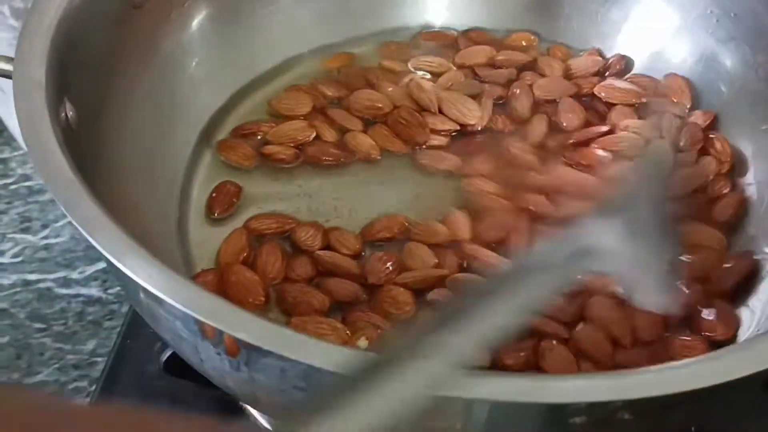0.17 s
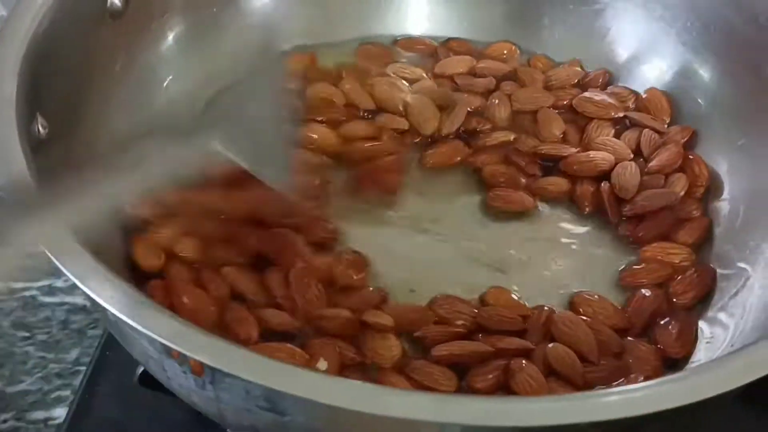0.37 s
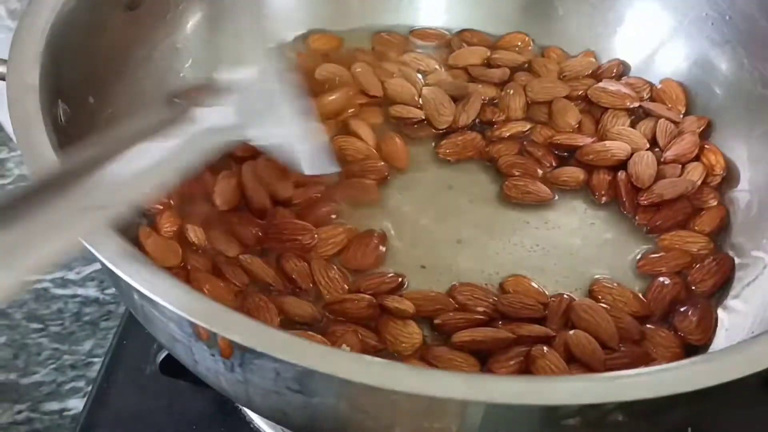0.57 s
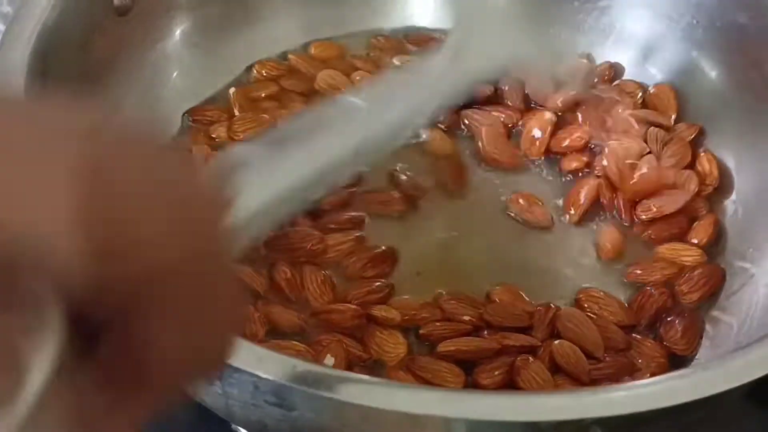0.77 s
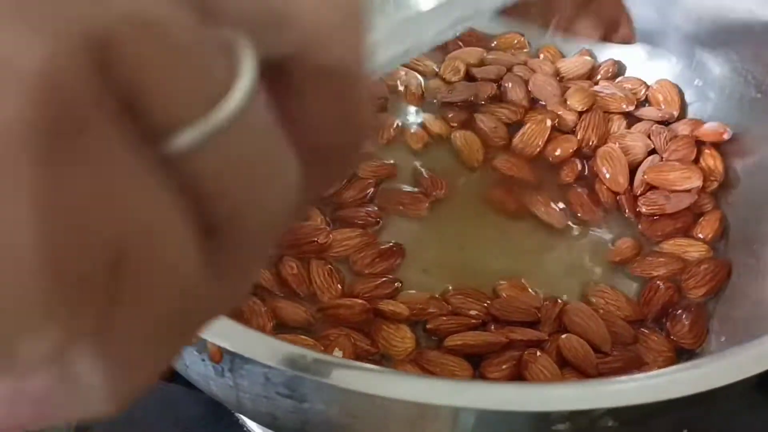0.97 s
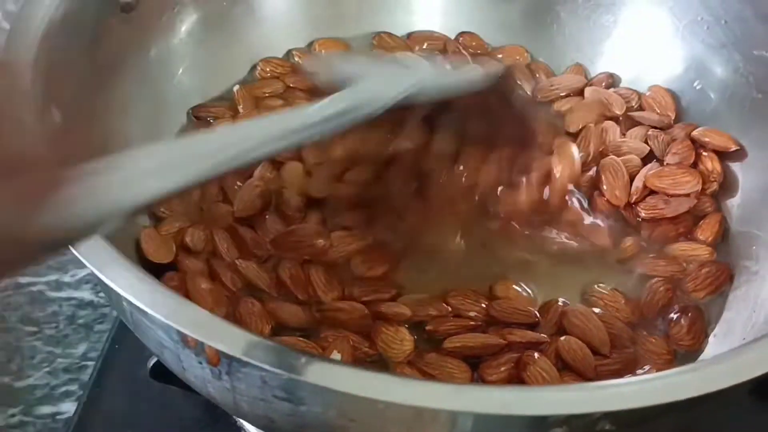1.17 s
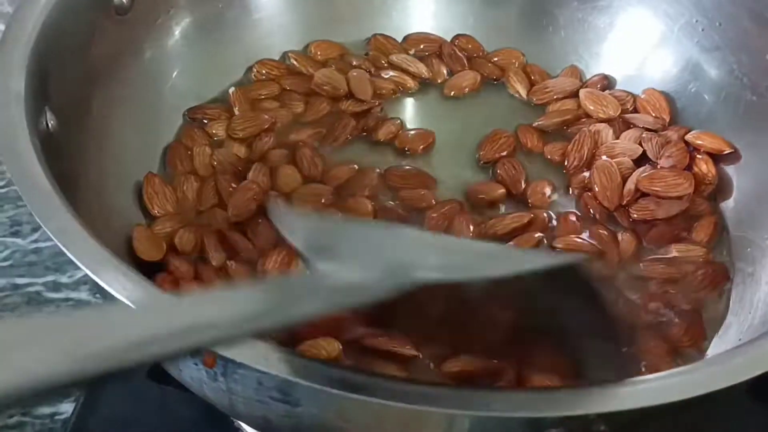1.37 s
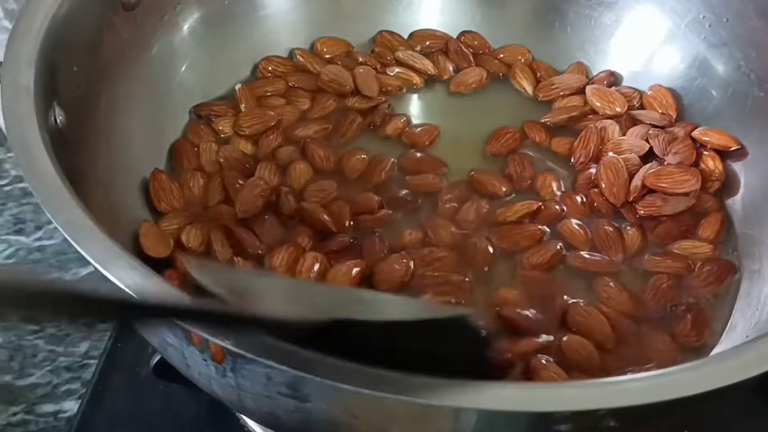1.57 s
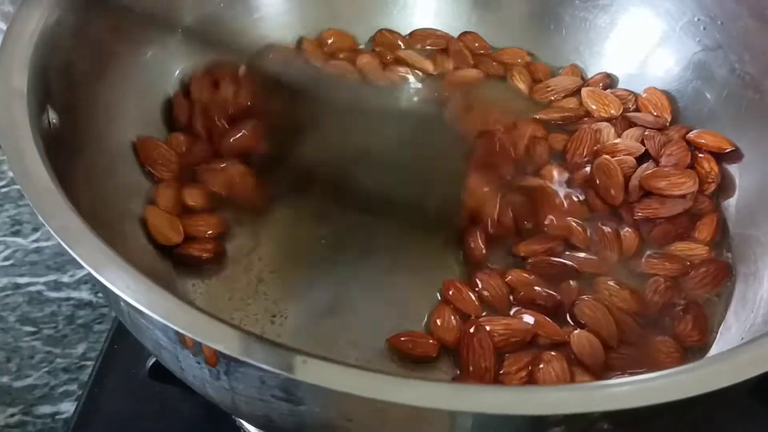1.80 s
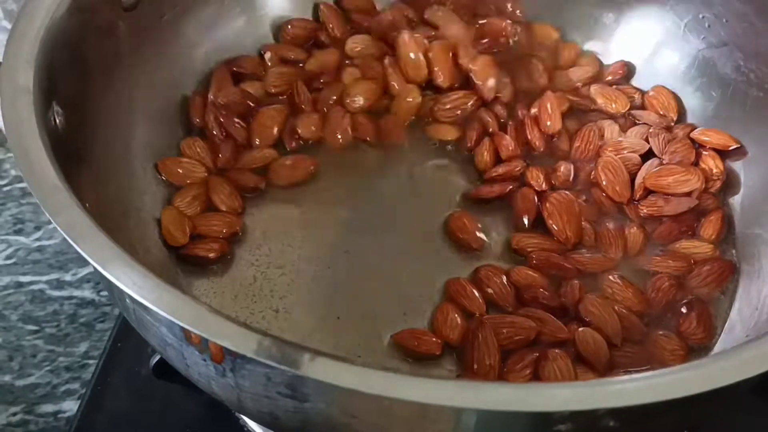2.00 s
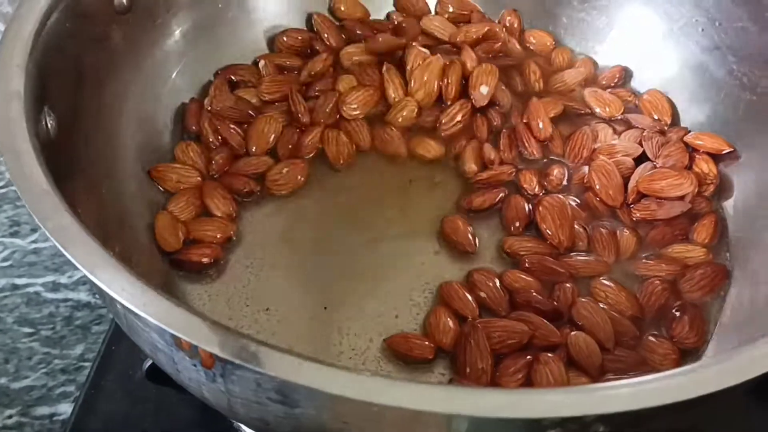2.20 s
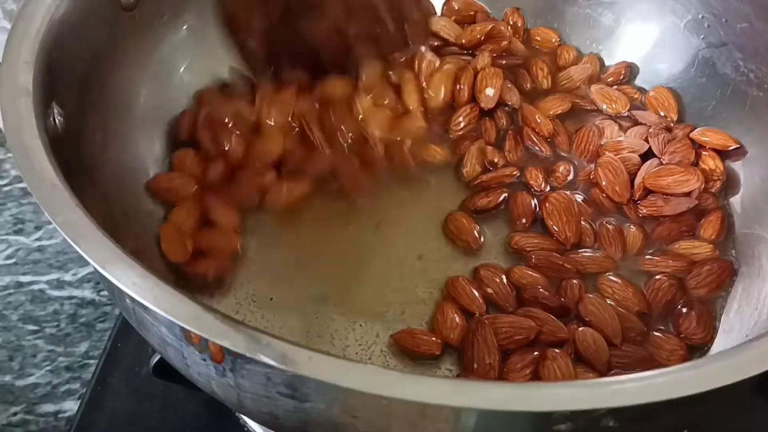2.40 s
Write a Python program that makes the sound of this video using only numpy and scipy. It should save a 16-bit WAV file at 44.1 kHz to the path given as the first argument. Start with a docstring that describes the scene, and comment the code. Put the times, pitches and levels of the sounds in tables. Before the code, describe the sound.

A steel spoon clanks and scrapes against a ringing steel pan while stirring nuts.

```python
"""A steel spoon stirs nuts in hot fat in a steel pan, close by and a little to the left.
The pan is already ringing over a low room rumble when the spoon strikes and drags across the base.
More blows follow: each cracks, then pan and spoon ring on. In between, the spoon scrapes, nuts slide
and knock, and the fat spits faintly. Just past halfway the sound cuts out for a moment.
It returns on ringing steel, with two more blows, one more spit and a few last knocks."""
import sys
import numpy as np
from scipy import signal
from scipy.fft import rfft, irfft
from scipy.io import wavfile

SR = 44100
rng = np.random.default_rng(int(sys.argv[2]) if len(sys.argv) > 2 else 0)


def master(y):
    """Save y as 16-bit WAV."""
    cut = np.clip(np.atleast_2d(y).T, -1, 1)
    pcm = np.round(cut * 32767)  # scale
    wavfile.write(sys.argv[1], SR, pcm.astype(np.int16))


N = 108045
T = np.arange(N) / SR
HZ = np.maximum(np.arange(N // 2 + 1) * SR / N, 1)

# The spoon's blows; the row at 1.553 s is the steel ring returning briefly after the cut-out.
# A fade is the time to die away by 60 dB; crack, pan and spoon add to the band levels.
# start_s, hold_s, fade_s, crack_db, pan_db, spoon_db, place (0 base, 1 wall),
# corner (0 spoon's edge, 1 its corner), then level_db for each band
BLOWS_AND_RING = [(-.03, 0.022, 0.52, -32, 10, -48, 0.33, 0.29, -41.5, -43.5, -32.5, -38, -50),
                  (0.2136, 0.068, 0.66, 12.5, 0, -11, 0.12, 0, -25, -22, -19.5, -26.5, -30),
                  (.669, 0.0013, 0.55, 10.5, -3, 0, 0.055, 0.38, -55, -38.5, -36, -48, -70),
                  (1.070, 0.055, 0.45, 14.5, 5, 4, 0.66, 0.11, -33.5, -35.5, -28, -23.5, -24.5),
                  (1.2115, 0.018, 0.5, 5.5, -14, -6.5, 0.82, 0.36, -24.5, -22, -22.5, -19, -14.5),
                  (1.3139, 0.031, 0.72, 16.5, -7, -9, 1, 0, -26, -26, -26.5, -26.5, -33),
                  (1.553, 0.027, 0.25, 6, -3.5, -5, 1, 0.17, -41, -32.5, -37.5, -34, -65),
                  (1.8424, 0.024, 0.98, 15.5, -7, 6, 1, 0.83, -46.5, -41, -30.5, -30.5, -33.5),
                  (2.127, 0.02, 0.53, 13, -1, -6, 1, 0.9, -32.5, -33.5, -24.5, -25.5, -26)]
# Five bands, from low to high: pitch_hz
BANDS_HZ = [700, 1400, 3000, 6000, 12000]
# How long each band rings: multiple of the row's fade_s
BAND_FADES = [0.91, 1.21, 0.91, 0.88, 0.52]
RISE_S, CHOKE = .0017, .36  # each new row damps this share of what still rings
CRACK_SHAPE_S = dict(rise=.0006, hold=.002, fade=.03)


def blows_and_ring():
    """A blow cracks, then pan and spoon ring; one row is just the ring returning after the cut-out."""
    out = np.zeros((2, N))
    rings, cracks = steel_bands()
    pan, spoon = pan_notes(), spoon_notes()
    for start, hold, fade, crack_db, pan_db, spoon_db, place, corner, *band_db in BLOWS_AND_RING:
        span = slice(max(int(start * SR), 0), int(start * SR) + SR)
        age = np.maximum(T[span] - start, 0)
        rise = 1 - np.exp(-age / RISE_S)
        dying = lambda seconds: rise * np.exp(-np.log(1000) * np.maximum(age - hold, 0) / seconds)
        strength = lambda hz: gain(read_at(list(zip(BANDS_HZ, band_db)), hz))
        snap = gain(crack_db) * envelope(start, **CRACK_SHAPE_S)[span]
        out[:, span] *= 1 - CHOKE * rise
        for hz, ring, crack, share in zip(BANDS_HZ, rings, cracks, BAND_FADES):
            out[:, span] += strength(hz) * (ring[:, span] * dying(fade * share) + crack[:, span] * snap)
        stretch = fade / .7  # the notes last longer when the steel rings freely
        for notes, level_db, contact in (pan, pan_db, place), (spoon, spoon_db, corner):
            for hz, note_fade, contact_db, wave in notes:
                level = strength(hz) * gain(level_db + np.interp(contact, [0, 1], contact_db))
                out[:, span] += level * dying(note_fade * stretch) * wave[:, span]
    return out


# The spoon bouncing just after a blow: start_s, strength_db (compared with the ring)
BOUNCES = [(.250, -20), (1.090, 9), (1.24, -3)]
# How the microphone colours the crack and dense ring: pitch_hz, level_db
MIC_COLOUR = [(200, -10), (420, -14), (750, 3.5), (1200, -6.5), (2400, -1.5), (4200, 0), (6200, 15.5),
              (7800, 4.5), (9500, 1.5), (13000, -14.5), (15500, -5.5)]
BASS_HZ = 517  # below this the steel gives off less sound
OVERTONE_GAP_HZ, OVERTONE_WIDTH_HZ = 89.8, 70  # the gap is an average


def steel_bands():
    """Struck steel, band by band: crowded overtones for the ring and smooth noise for the crack."""
    bass_cut = (gain(9) + 1 / (1 + (BASS_HZ / HZ) ** 6)) * np.minimum(HZ / 220, 1) ** 2
    colour = gain(read_at(MIC_COLOUR, HZ)) * sides(read_at(BALANCE, HZ)) * bass_cut
    chosen = rng.random(len(HZ)) < SR / N / OVERTONE_GAP_HZ
    peaks = chosen * gain(3.5 * rng.standard_normal(len(HZ)))
    overtones = unit(np.convolve(peaks, np.hanning(int(OVERTONE_WIDTH_HZ * N / SR)), "same"))
    steel = gain(-9) + overtones * np.clip(HZ / BANDS_HZ[2], 0, 1) ** 2  # peaks on a smooth bed
    bands = [np.interp(np.log(HZ), np.log(BANDS_HZ), row) * colour for row in np.eye(len(BANDS_HZ))]
    bounce = 1 + sum(gain(db) * envelope(start, **CRACK_SHAPE_S) for start, db in BOUNCES)
    rings = [unit(filtered(stereo_noise(), band * steel)) * nut_rattle() * bounce for band in bands]
    cracks = [unit(filtered(stereo_noise(), band)) for band in bands]
    cracks[0] *= gain(-10.5)  # the crack has little bass
    return rings, cracks


# The pan's own notes: pitch_hz, fade_s (before a blow stretches it), base_hit_db, wall_hit_db
PAN_NOTES = [(620, 0.31, -12.5, -13), (766, 0.72, 1, -22.5), (961, 0.87, -4.5, -33), (992, 0.8, -6.5, -3),
             (1025, 0.75, -16, 2.5), (1445, 0.53, -3, 0.5), (1506, 0.61, -1, -5), (1720, 0.73, -7, -7.5),
             (2000, 0.72, -6.5, -1.5), (2416, 0.55, -15.5, -23.5), (3154, 0.7, -11, -30.5)]


def pan_notes():
    """The pan vibrates at fixed pitches; where it is hit decides how strong each one is."""
    return [(hz, fade, contact_db, steel_note(hz)) for hz, fade, *contact_db in PAN_NOTES]


# The spoon's own notes: pitch_hz, edge_hit_db, corner_hit_db
SPOON_NOTES = [(577, 1, 0.5), (1325, -33, 1), (1418, 11, -24), (1625, 2, -23), (1940, -26.5, 3.5),
               (2596, -0.5, -22.5), (2630, -28.5, -1), (3224, -26.5, -9.5), (3570, -12.5, -7),
               (3980, -6.5, -26), (4550, -11.5, -16.5), (6090, -11, -36.5)]


def spoon_notes(base_fade_s=.47):
    """The spoon vibrates too; the part that hits decides how strong each note is."""
    return [(hz, base_fade_s, contact_db, steel_note(hz)) for hz, *contact_db in SPOON_NOTES]


# How far to the left the steel sounds: pitch_hz, left_minus_right_db
BALANCE = [(300, 1.5), (700, 4.5), (1400, 13.5), (3000, 4), (12000, 0)]


def steel_note(hz, shimmer=.67, shimmers_per_s=45):
    """One ringing note, wavering differently in each microphone."""
    phase = 2 * np.pi * rng.random() + .5 * rng.standard_normal((2, 1))
    steps = rng.standard_normal((2, 256)) + 1j * rng.standard_normal((2, 256))
    waver = 1 + shimmer * np.array([np.interp(T * shimmers_per_s, np.arange(256), s) for s in steps])
    wave = np.imag(waver * np.exp(1j * (phase + 2 * np.pi * hz * T)))
    return np.sqrt(2) * sides(read_at(BALANCE, hz)) * wave


def nut_rattle(jolts_per_s=70, depth=.45, settle_s=.005):
    """Loose nuts jolt the ringing pan at random, so its loudness jumps and falls back."""
    jolts = (rng.random(N) < jolts_per_s / SR) * rng.exponential(size=N)
    return unit(1 + depth * signal.lfilter([1], [1, -np.exp(-1 / (settle_s * SR))], jolts))


# One drag of the spoon: start_s, rise_s, hold_s, fade_s, pitch_hz, level_db
SPOON_DRAG = (.234, .015, .042, .27, 769, -14.5)


def drag():
    """The spoon drags over the base, and the pan's low note swells and fades."""
    start, rise, hold, fade, hz, db = SPOON_DRAG
    note = np.sqrt(2) * np.sin(2 * np.pi * hz * T)
    return gain(db) * sides(read_at(BALANCE, hz)) * envelope(start, rise, hold, fade) * note


# Nuts hitting the pan: start_s, pitch_hz, level_db, swell_s (half the time to the peak),
# click_db (compared with the note)
NUT_KNOCKS = [(0.413, 1473, -28.5, 0.0088, 7), (0.797, 1010, -21, 0.003, -13.5),
              (.834, 1092, -25, 0.0042, -4), (.873, 986, -26, 0.0085, -1.5),
              (1.316, 1086, -7.5, 0.0021, -7), (1.346, 2780, -16.5, 0.0022, -4),
              (1.630, 985, -34.5, 0.0074, -5), (2.002, 2020, -28, 0.0034, 3),
              (2.083, 1030, -25, 0.0051, 4.5), (2.082, 2853, -26, 0.0022, -29),
              (2.128, 1057, -19, 0.0033, 1), (2.266, 1260, -16, 0.002, -14),
              (2.302, 1227, -24.5, 0.0019, -21)]


def knocks(wobble_hz=120.4):
    """A nut meets the pan: a click and a short, unsteady hollow note."""
    out = np.zeros(N)
    pan_noise = unit(loaded_pan(rng.standard_normal(N)))
    wobble = .13 * unit(filtered(rng.standard_normal(N), 1 / (1 + (HZ / wobble_hz) ** 2)))
    for start, hz, db, swell, click_db in NUT_KNOCKS:
        age = np.maximum(T - start, 0)
        loudness = (age / swell / 2) ** 2 * np.exp(2 - age / swell)
        note = np.sqrt(2) * loudness * np.sin(2 * np.pi * hz * age + wobble * hz / 1000)
        click = gain(click_db) * pan_noise * envelope(start, rise=.0023, hold=.012, fade=.015)
        out += gain(db) * (note + click)
    return kitchen(out, left_db=22, echo_db=-5)


# How loud the scraping is: time_s, level_db
SCRAPE_LEVELS = [(0.17, -45), (.195, -28.5), (.41, -25), (.47, -53), (.65, -63.5), (.69, -31),
                 (.825, -52.5), (.86, -25.5), (.93, -51.5), (.99, -39), (1.05, -50.5), (1.82, -63),
                 (1.94, -56), (1.995, -26.5), (2.05, -41), (2.09, -36), (2.37, -63)]
CONTACTS = dict(per_s=980, scatter_db=3.5)


def scrape():
    """The spoon sticks and slips through the nuts; the tiny contacts ring the pan."""
    contacts = tiny_clicks(**CONTACTS)
    scraping = loaded_pan(contacts * level_curve(SCRAPE_LEVELS)) / np.std(loaded_pan(contacts))
    return kitchen(scraping, left_db=16, echo_db=-3)


# Pitches the full pan brings out: pitch_hz, width_hz, level_db
PAN_RESONANCES = [(1030, 67, 2.5), (1561, 65, 11.5), (1986, 28, 14), (2435, 47, 2), (2927, 80, 7.5),
                  (3670, 730, -17), (5600, 800, -28)]


def loaded_pan(x, low_hz=645, top_hz=6900):
    """The pan resonates when touched, damped by the food in it."""
    peaks = sum(gain(db) / (1 + 1j * (HZ / hz - hz / HZ) * hz / width)
                for hz, width, db in PAN_RESONANCES)
    middle = 1j * HZ / (1j * HZ + low_hz) / (1 + 1j * HZ / top_hz)
    return filtered(x, peaks * middle ** 2)


# Nuts sliding in the fat: start_s, hold_s, pitch_hz, width_hz, level_db
NUT_SLIDES = [(0.694, .08, 1072, 52.4, -36.5), (0.869, 0.12, 1534, 216, -37),
              (1.339, 0.067, 1128, 200, -25.5), (1.704, 0.0093, 2090, 254, -33.5),
              (1.777, 0.011, 2070, 420, -37), (2.264, 0.034, 1372, 295, -35.5)]


def slides(sink_octaves_per_s=.55):
    """Oily nuts slide in a heap: tiny contacts in a hollow tone that sinks as the heap spreads."""
    out = np.zeros(N)
    for start, hold, hz, width, db in NUT_SLIDES:
        smooth = 1 / (1 + 1j * HZ / width) ** 2
        flutter = [unit(filtered(tiny_clicks(**CONTACTS), smooth)) for _ in range(2)]
        pitch = hz * 2 ** (-sink_octaves_per_s * np.maximum(T - start, 0))
        phase = 2 * np.pi * np.cumsum(pitch) / SR
        hollow = flutter[0] * np.cos(phase) + flutter[1] * np.sin(phase)
        out += gain(db) * envelope(start, RISE_S, hold, fade=.11) * hollow
    return kitchen(out, left_db=16, echo_db=-3)


# Spits of hot fat: peak_s, width_s, level_db
FAT_SPITS = [(0.992, 0.0084, -41.5), (1.976, 0.018, -31)]
# The tone of their crackle: pitch_hz, level_db
FAT_COLOUR = [(1500, -16.5), (6000, -4), (15500, -13.5)]


def fat():
    """Frying fat spits in short spurts of fine crackle."""
    spurts = sum(gain(db) * np.exp(-.5 * ((T - peak) / width) ** 2) for peak, width, db in FAT_SPITS)
    crackle = unit(filtered(tiny_clicks(per_s=23000, scatter_db=8.5), gain(read_at(FAT_COLOUR, HZ))))
    return kitchen(spurts * crackle, left_db=4.5, echo_db=-11)


def kitchen(x, left_db, echo_db):
    """Place a sound to the left and add the kitchen's short echo."""
    tail = (stereo_noise() * envelope(start=.009, rise=.0013, hold=0, fade=.27))[:, :SR]
    tail /= np.sqrt(np.sum(tail ** 2, axis=1, keepdims=True))
    echo = signal.fftconvolve(x[None], tail, axes=1)[:, :N]
    return sides(left_db) * x + gain(echo_db) * sides(left_db * .23) * echo


# The tone of the room: pitch_hz, level_db
RUMBLE_COLOUR = [(50, -5), (88, 3), (300, -5.5), (1500, -19.5), (4000, -28), (16000, -31)]


def room_rumble(level_db=-55):
    """The room rumbles, low and steady."""
    return gain(level_db) * unit(filtered(stereo_noise(), gain(read_at(RUMBLE_COLOUR, HZ))))


def gain(db):
    """Turn decibels into a multiplier."""
    return 10 ** (np.asarray(db) / 20)


def unit(x):
    """Scale to an average power of 1."""
    return x / np.sqrt(np.mean(x ** 2))


def read_at(points, hz):
    """Read between (pitch_hz, value) points, with octaves evenly spaced."""
    pitches, values = np.array(points, float).T
    return np.interp(np.log(hz), np.log(pitches), values)


def level_curve(points):
    """Gain over time from (time_s, level_db) points."""
    return gain(np.interp(T, *np.array(points, float).T))


def filtered(x, gains):
    """Turn each frequency up or down."""
    return irfft(rfft(x) * gains, N)


def sides(db):
    """Left and right gains for a level difference."""
    pair = gain(np.array([[1], [-1]]) * db / 2)
    return pair / np.sqrt(np.mean(pair ** 2, axis=0))


def stereo_noise(likeness=.15):
    """Two partly alike noises."""
    shared = np.sqrt(likeness) * rng.standard_normal(N)
    return shared + np.sqrt(1 - likeness) * rng.standard_normal((2, N))


def envelope(start, rise, hold, fade):
    """Rise, hold, then die away; all in seconds."""
    age = np.maximum(T - start, 0)
    return (1 - np.exp(-age / rise)) * np.exp(-np.log(1000) * np.maximum(age - hold, 0) / fade)


def tiny_clicks(per_s, scatter_db):
    """Random clicks of scattered size."""
    clicks = (rng.random(N) < per_s / SR) * rng.choice([-1, 1], N)
    return unit(clicks * gain(scatter_db * rng.standard_normal(N)))


def scene(left_late_s=.0009):
    """Spoon, nuts and fat reach the left microphone a moment late; the drag and room are added on top."""
    left, right = blows_and_ring() + knocks() + slides() + scrape() + fat()
    left = np.pad(left, (int(left_late_s * SR), 0))[:N]
    return np.array([left, right]) + drag() + room_rumble()


# The brief gap; the first and last levels hold before and after it: time_s, level_db
CUT_OUT = [(1.436, -6), (1.441, -23), (1.47, -52.5), (1.553, -67.5), (1.556, -6.5)]


def record(dry, top_hz=16000):
    """The sound cuts out briefly, and the highest treble is removed."""
    treble_cut = signal.ellip(8, .2, 70, top_hz, fs=SR, output="sos")
    return signal.sosfilt(treble_cut, dry * level_curve(CUT_OUT))


dry = scene()
out = record(dry)
master(out)
```